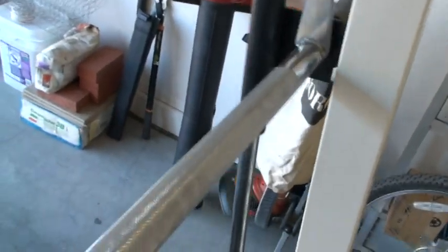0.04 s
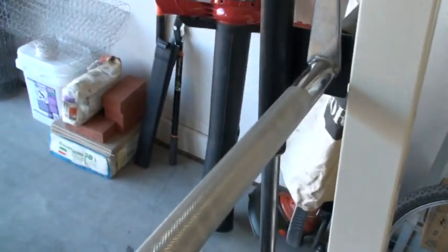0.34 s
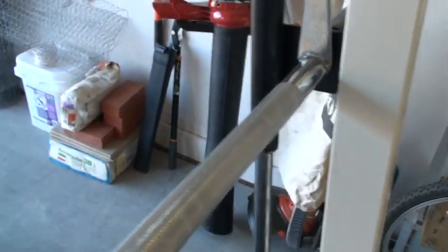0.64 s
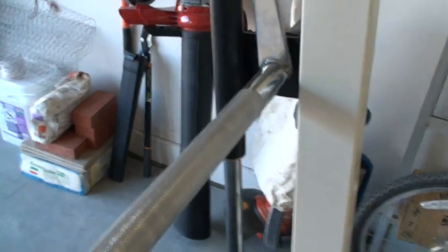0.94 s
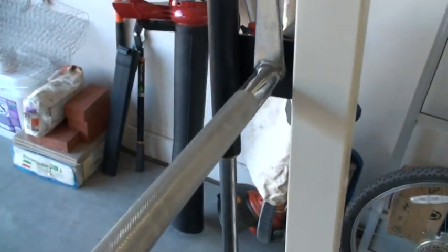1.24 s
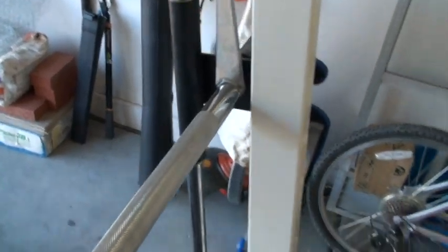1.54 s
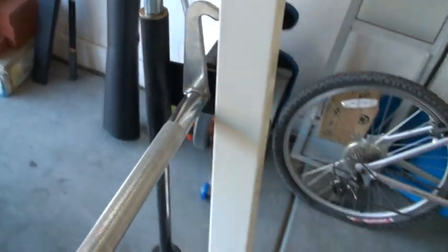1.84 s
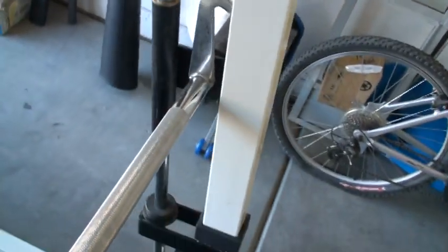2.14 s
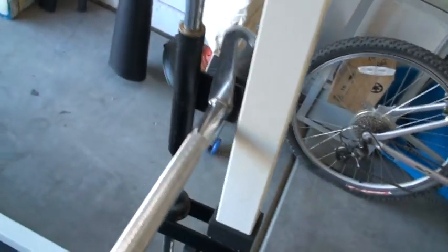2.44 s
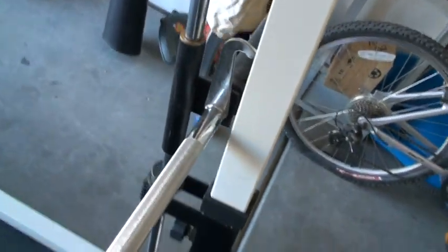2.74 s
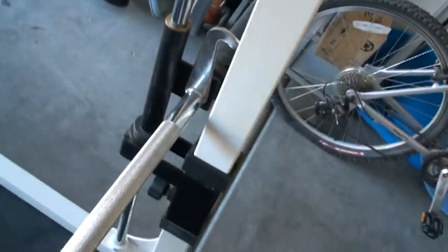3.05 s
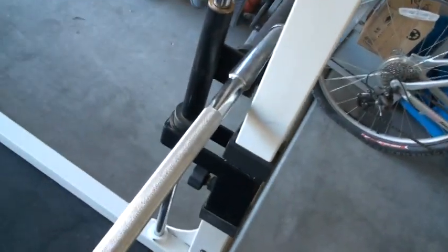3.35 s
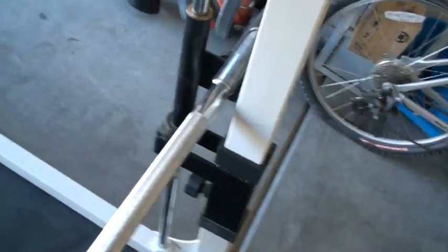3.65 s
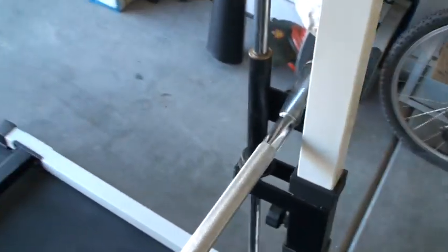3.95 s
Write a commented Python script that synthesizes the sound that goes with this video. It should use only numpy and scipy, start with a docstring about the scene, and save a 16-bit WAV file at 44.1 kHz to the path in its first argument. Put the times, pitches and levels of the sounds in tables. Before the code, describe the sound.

A steel bar clanks on a gym machine in a garage. Two dull knocks open, followed by faint rubbing. From about 1.2 seconds the bar's hook clanks and rattles against the upright, loudest until 2 seconds, then sparser. Around 3.2 seconds come more clanks and a soft thud, leaving a high, wavering ring that fades until damped near 3.8 seconds. A faint rumble and hum lie underneath.

```python
"""A steel bar is handled on a home gym machine in a garage, over low rumble and a faint hum.
First the frame knocks twice, dully, and the carriage rubs along its guide rod. From 1.15 s the bar's
hook clanks and chatters against the upright, ringing both hook and frame; a limiter flattens the loud
clanks. Just after 3 s the frame knocks again and the base thuds on the floor. The last blows leave the
hook ringing free, two close modes beating, until it is damped near 3.8 s."""
import sys
import numpy as np
from scipy import signal
from scipy.io import wavfile
from scipy.ndimage import uniform_filter1d, minimum_filter1d

SR = 44100
rng = np.random.default_rng(int(sys.argv[2]) if len(sys.argv) > 2 else 0)


def pcm_store(signal):
    """Save signal as 16-bit PCM."""
    levels = np.round(np.clip(np.atleast_2d(signal), -1, 1) * 32767)
    wavfile.write(sys.argv[1], SR, levels.astype(np.int16).T)


N = 176400
BLOW_S, BAND_EDGE_HZ = .7, 18150
BASS_SHELF_HZ, TREBLE_SHELF_HZ = (700, 1520), (2200, 6700)

# Hook on upright: t/s, level/dB, bass/dB, treble/dB, rattle decay/s, hook ring/dB,
# contact place (0 tip, 1 bend, 2 and up shank)
CLANK_HITS = [(1.1542, -21.5, -5.5, 6.5, 0.13, -4, 0.3), (1.205, -25.5, 0.5, 7.5, .04, 4, 1.37),
              (1.267, -16.5, 0, 4, 0.049, 1.5, 0.96), (1.36, -32, 8.5, -36, 0.035, -14, 1),
              (1.455, -15.5, -2, 1.5, 0.049, -1, 1), (1.513, -30, 11, -43, 0.013, 3, 1),
              (1.610, -19.5, 3, 5.5, 0.086, 2.5, 1.1), (1.675, -19, -1.5, 4, 0.039, -18, .9),
              (1.738, -20.5, 5.5, -2.5, 0.054, 6.5, 0.65), (1.775, -25.5, 6, -2, 0.023, 2, 1),
              (1.812, -36, 3, 4, 0.014, 10.5, 1), (1.897, -18, 4.5, 4.5, 0.011, 5, 1),
              (1.968, -33.5, 12.5, 0, 0.0067, 9, 1), (2.113, -24.5, 2, 1.5, .013, -6.5, 1.3),
              (2.231, -36, 8, 1, 0.012, -6, 1.2), (2.262, -46, 4, -11, 0.0057, -17, 2.4),
              (2.4446, -24, 2, 2.5, 0.0063, 2, 1.73), (2.7127, -19.5, 1.5, -7.5, 0.022, 1.5, 3.4),
              (2.764, -23, 5.5, -3.5, 0.016, -4, 1.9), (2.884, -22, 0.5, -3, 0.0066, -3.5, 1.8),
              (2.968, -28.5, 4, -0.5, 0.0066, -11, 2), (3.069, -36, -3, -0.5, 0.041, -9, 0.95),
              (3.159, -17, -1.5, 5.5, 0.063, -19.5, 2.5), (3.204, -23, -4, 2.5, 0.038, -13, 1),
              (3.262, -20, -2, 0, 0.029, -23, 1.4)]


def clanks(modes):
    """Each contact rings the frame and the hook; returns the two layers."""
    frame, hook = np.zeros((2, 2, N))
    eq = upright_eq()
    next_times = [hit[0] for hit in CLANK_HITS[1:]] + [N / SR]
    for (at_s, db, bass_db, treble_db, rattle_s, ring_db, place), next_s in zip(CLANK_HITS, next_times):
        add(frame, at_s, frame_blow(modes, eq, db, bass_db, treble_db, rattle_s))
        add(hook, at_s, hook_ring(db + ring_db, treble_db, rattle_s, place, next_s - at_s))
    return frame, hook


# Clank spectrum: f/Hz, level/dB
CLANK_EQ = [(40, -33.5), (180, -33.5), (320, -20), (450, -25), (620, -12.5), (860, -8), (1050, -12.5),
            (1350, -14), (1560, -8), (1680, 7.5), (1830, -1), (2080, -10), (2600, -7.5), (3100, -16.5),
            (4300, -15.5), (4800, -19), (5400, -15.5), (6600, -20.5), (8200, -23.5), (9200, -32),
            (10600, -26), (12200, -31.5), (13500, -48), (18000, -49)]
# Tube wall resonances: f/Hz
TUBE_PEAKS_HZ = [3466, 4370, 5375, 6230, 7240, 8310]


def upright_eq(peak_db=2.5, valley_db=-1.5, width_hz=208):
    """The upright's tube wall adds broad peaks and valleys to the clank spectrum."""
    hz = np.linspace(0, SR / 2, 441)
    peaks = np.exp(-((hz[:, None] - np.array(TUBE_PEAKS_HZ)) / width_hz) ** 2).max(axis=1)
    valleys = (1 - peaks) * ((hz > min(TUBE_PEAKS_HZ)) & (hz < max(TUBE_PEAKS_HZ)))
    return np.column_stack([hz, at_hz(CLANK_EQ, hz) + peak_db * peaks + valley_db * valleys])


# Hook modes in contact: f/Hz, level/dB struck at tip, at bend, at shank, t60/s
HOOK_MODES = [(873, -28.5, -19.5, -4, .28), (1673, -0.5, 3, 0, 0.63), (1617, -10, -23, -10, .25),
              (1830, -11, -5.5, -7, .28), (1910, -11, -10.5, -10, .25), (1840, -5, -13.5, -17.5, .25),
              (2225, -20, -15.5, -19.5, 0.28), (2587, -3, -9, -2, .2), (2680, -9, -15.5, -5, .3),
              (3450, -19.5, -22.5, -16.5, .2), (4313, -8, -6.5, -16.5, 0.21),
              (4760, -14, -28.5, -26.5, 0.15), (5260, -17, -13.5, -29.5, 0.17),
              (5496, -35.5, -23, -22, .35), (6010, -8, -18.5, -25.5, 0.32), (6052, -4, -17, -26, .35),
              (6220, -23, -22, -18.5, 0.22), (7200, -11, -27, -28.5, .35), (7420, -22, -23, -16, 0.25),
              (7900, -14, -30, -31, .3), (8760, -26, -24.5, -22.5, .3), (10080, -20.5, -22, -18, 0.18)]


def hook_ring(db, treble_db, rattle_s, place, until_s, rise_s=.003, rub_db=-1.5, rub_s=.065, cut_s=.02):
    """Hook modes, weighted by contact place, fed by rebounds and stopped by the next clank."""
    t = np.arange(0, BLOW_S, 1 / SR)
    hz, *place_db, t60 = np.transpose(HOOK_MODES)
    place_weights = np.maximum(1 - abs(np.arange(3) - np.clip(place, 0, 2)), 0)
    mode_db = place_weights @ np.array(place_db)
    detune, scatter, *phases = rng.standard_normal((4, len(hz)))
    shelf_db = at_hz(list(zip(TREBLE_SHELF_HZ, (0, treble_db))), hz)
    gain = amp(db + mode_db + 1.5 * scatter + shelf_db)
    waves = np.exp(np.outer(2j * np.pi * hz * (1 + .0015 * detune) - np.log(1000) / t60, t))
    ring = ((gain * np.exp(2j * np.pi * np.array(phases))) @ waves).imag
    ring = chatter(ring * (1 - np.exp(-t / rise_s)), rattle_s, rebound_db=-17)
    rub_loss = amp(rub_db * (np.minimum(t / rub_s, 1) - .5))  # the wide early swing rubs on the upright
    cut = np.exp(-np.maximum(t - until_s, 0) / cut_s)
    return ring * rub_loss * cut


def chatter(hit, rattle_s, rebound_db, rate_hz=170, count=40):
    """A first contact repeats as irregular, dying rebounds."""
    size = hit.shape[1]
    delay_s = np.cumsum(rng.uniform(.2, 1.8, count)) / rate_hz
    strength = amp(rebound_db) * rng.uniform(.5, 1.5, count) * np.exp(-delay_s / rattle_s)
    contacts = np.zeros(size)
    contacts[np.minimum(delay_s * SR, size - 1).astype(int)] = strength
    contacts[0] = 1
    return signal.fftconvolve(hit, contacts[None], axes=1)[:, :size]


# Free hook, main mode and its lower twin: level/dB, t60/s
BEATING_PAIR = [(4, 0.93), (-10.5, 1.7)]
# Free hook, weaker modes: f/Hz, level/dB, t60/s
FREE_MODES = [(1530, -40, 2.2), (1685, -9, 0.53), (1728, -19, 0.37), (1650, -22.5, 0.54),
              (1700, -17.5, 1.2), (2000, -15, 0.71), (2100, -25.5, 0.59), (2202, -31, 0.74),
              (4295, -11, 0.39), (5740, -22.5, 0.18), (6368, -16.5, 0.27), (7230, -14, .3),
              (8400, -16.5, 0.23)]


def free_hook(at_s=3.196, main_hz=1655, beat_hz=18, rise_s=.075, damp_at_s=3.79, damp_s=.11, damp_db=-10):
    """The released hook swells and rings on, two close modes beating, until damped."""
    t, out = np.arange(SR) / SR, np.zeros((2, N))
    modes = [(main_hz, *BEATING_PAIR[0]), (main_hz - beat_hz, *BEATING_PAIR[1])] + FREE_MODES
    ring = sum(amp(db) * np.exp((2j * np.pi * hz - np.log(1000) / t60) * t) for hz, db, t60 in modes)
    mid_side = np.array([ring.imag, ring.real - .2 * ring.imag])  # leans right
    swell = np.minimum(t / rise_s, 1)
    damping = amp(damp_db * np.clip((t + at_s - damp_at_s) / damp_s, 0, 1))
    add(out, at_s, amp(-7) * mid_side * swell * damping)
    return out


# Frame decay: f/Hz, t60/s
FRAME_DECAY = [(200, 0.29), (900, 0.22), (1800, 0.36), (5000, 0.24), (9000, 0.19), (16000, .14)]


def frame_modes(count=900):
    """Crowded modes of the steel frame, one decaying sine per row, flat in spectrum overall."""
    t = np.arange(0, BLOW_S, 1 / SR, dtype=np.float32)
    rank = (np.arange(count) + rng.random(count)) / count
    hz = 60 + (BAND_EDGE_HZ - 60) * rank ** 2
    t60 = at_hz(FRAME_DECAY, hz) * np.exp(.095 * rng.standard_normal(count))
    omega, decay, weight = np.float32([2 * np.pi * hz, np.log(1000) / t60, np.sqrt(rank)])[:, :, None]
    return weight * np.exp(-decay * t) * np.sin(omega * t)


def frame_blow(modes, eq, db, bass_db, treble_db, rattle_s, fade_s=np.inf, crack_s=.002, rise_s=.0012):
    """A contact crack and the frame's ring, repeated by chatter; rows are mid and side."""
    count, size = modes.shape
    t, onset = np.arange(size) / SR, SR // 32  # the onset samples set the level
    ring = np.float32(rng.choice([-1, 1], (2, count)) * rng.uniform(.5, 1, (2, count))) @ modes
    ring /= ring[:, :onset].std()
    crack_gain = amp(-4) * np.sqrt(2 * onset / SR / crack_s)
    crack = crack_gain * np.exp(-t / crack_s) * rng.standard_normal((2, size))
    envelope = (1 - np.exp(-t / rise_s)) * np.exp(-t / fade_s)
    hit = chatter((ring + crack) * envelope, rattle_s, rebound_db=-11)
    bass = list(zip(BASS_SHELF_HZ, (bass_db, 0)))
    treble = list(zip(TREBLE_SHELF_HZ, (0, treble_db)))
    hit = equalise(hit, eq, bass, treble)
    return amp(db) * hit / hit[:, :onset].std(axis=1, keepdims=True)


# Frame knocks: t/s, level/dB, bass/dB, treble/dB, rattle decay/s
KNOCK_HITS = [(.035, -35, 5.5, -5, 0.0036), (0.0447, -25, -3.5, -7.5, 0.0069), (.059, -33.5, -4, 5, 0.012),
              (0.2113, -30, 0, -3, 0.0027), (.232, -60, 0, -2, .02), (1.147, -47, 2, -6.5, .005),
              (3.054, -34, 5.5, -2, 0.033), (3.129, -32, 1, 9.5, 0.09)]
# Knock spectrum: f/Hz, level/dB
KNOCK_EQ = [(40, -20.5), (150, -15.5), (320, -8.5), (480, -9.5), (620, -0.5), (1100, -1), (1500, -2.5),
            (2100, -2.5), (3000, -6.5), (4200, -13.5), (7000, -20.5), (9200, -31.5), (10700, -25.5),
            (13500, -42.5), (18000, -45.5)]


def frame_knocks(modes):
    """Dull, fast-fading blows on the frame."""
    out = np.zeros((2, N))
    for at_s, *knock in KNOCK_HITS:
        add(out, at_s, frame_blow(modes, KNOCK_EQ, *knock, fade_s=.045))
    return out


# Base on floor: t/s, level/dB
THUD_HITS = [(.228, -46), (3.053, -45), (3.191, -41)]
# Base modes: f/Hz, level/dB, t60/s
BASE_MODES = [(138, -3.5, .3), (176.4, -2.5, 0.26), (220, 2, 0.14), (326, -1.5, 0.52)]


def base_thuds(rise_s=.011):
    """The machine's base rocks on the concrete, ringing its low modes."""
    t, out = np.arange(0, BLOW_S, 1 / SR), np.zeros((2, N))
    for at_s, db in THUD_HITS:
        ring = sum(amp(mode_db - 60 * t / t60) * sine_pair(hz, t) for hz, mode_db, t60 in BASE_MODES)
        add(out, at_s, amp(db) * ring * np.minimum(t / rise_s, 1))
    return out


# Slide envelope: t/s, level/dB
SLIDE_LEVEL = [(0, -51), (.3, -68), (.73, -67), (.78, -51), (.88, -52), (1.0, -64.5), (1.13, -63),
               (1.5, -43.5), (2.37, -52), (2.65, -50.5), (3.12, -46.5), (3.3, -71), (3.6, -80.5)]
# Slide spectrum: f/Hz, level/dB
SLIDE_EQ = [(60, -2), (300, 4), (480, 2.5), (750, 5), (1300, 0.5), (2600, -2), (5000, -8.5), (8000, -12.5),
            (9300, -16.5), (10500, -6), (12000, -12.5), (13500, -19), (18000, -29)]


def carriage_slide(grain_db=.8):
    """Grainy rubbing of the carriage on its guide rod."""
    grain = amp(grain_db * unit_rms(uniform_filter1d(rng.standard_normal(N), size=300)))
    friction = equalise(rng.standard_normal((2, N)) * grain, SLIDE_EQ)
    return gain_curve(SLIDE_LEVEL) * unit_rms(friction)


# Rumble envelope: t/s, level/dB
RUMBLE_LEVEL = [(0, -61), (.7, -59), (1.1, -58.5), (2.0, -63), (3.1, -58), (3.4, -64), (3.6, -64.5),
                (4, -61.5)]
# Rumble and air spectrum: f/Hz, level/dB
RUMBLE_EQ = [(15, -11.5), (35, -3.5), (75, 1), (130, -2.5), (280, -10.5), (450, -14), (1500, -19.5),
             (6000, -34.5), (17000, -41)]
# Hum: f/Hz, level/dB
HUM_TONES = [(75.4, -79.5), (242, -70.5), (479, -80)]


def background():
    """Low handling rumble, still air and a faint steady hum."""
    t = np.arange(N) / SR
    hum = sum(amp(db) * np.sqrt(2) * sine_pair(hz, t) for hz, db in HUM_TONES)
    rumble = unit_rms(equalise(rng.standard_normal((2, N)), RUMBLE_EQ))
    return gain_curve(RUMBLE_LEVEL) * rumble + hum


# Garage decay: f/Hz, t60/s
GARAGE_DECAY = [(100, 0.92), (400, 0.37), (1000, 0.4), (2700, 0.41), (7000, .35), (10000, 0.28),
                (15000, 0.28)]


def garage(x, predelay_s=.0023):
    """Diffuse reflections, each band dying at its own rate."""
    hz, t, spectrum = signal.stft(rng.standard_normal((2, SR * 3 // 4)), SR, nperseg=256)
    decay = np.exp(-np.log(1000) * t / at_hz(GARAGE_DECAY, hz)[:, None])
    tail = signal.istft(spectrum * decay, SR, nperseg=256)[1]
    tail *= np.arange(tail.shape[1]) / SR > predelay_s
    return signal.fftconvolve(x, tail / np.linalg.norm(tail[0]), axes=1)[:, :N]


def amp(db):
    """dB to gain."""
    return 10 ** (np.asarray(db) / 20)


def unit_rms(x):
    """Scale to rms 1."""
    return x / np.sqrt(np.mean(x ** 2) + 1e-20)


def sine_pair(hz, t):
    """Mid and side sines at random phases."""
    return np.sin(2 * np.pi * (hz * t + rng.random((2, 1))))


def at_hz(table, hz):
    """Interpolate a table over log frequency."""
    table_hz, value = np.transpose(table)
    return np.interp(np.log(hz + 1), np.log(table_hz + 1), value)


def gain_curve(table):
    """Per-sample gain from a (t/s, level/dB) table."""
    return amp(np.interp(np.arange(N) / SR, *np.transpose(table)))


def add(mix, at_s, sound):
    """Mix a sound in, in place."""
    part = mix[:, round(at_s * SR):][:, :sound.shape[-1]]
    part += sound[..., :part.shape[1]]


def equalise(x, *tables, size=4096):
    """Minimum-phase filter from summed (f/Hz, level/dB) tables."""
    hz = abs(np.fft.fftfreq(size, 1 / SR))
    log_gain = np.log(amp(sum(at_hz(table, hz) for table in tables)))
    taps = np.fft.ifft(np.exp(np.conj(signal.hilbert(log_gain)))).real[:size // 2]
    return signal.fftconvolve(x, taps[None], axes=1)[:, :x.shape[1]]


# Stereo width, as side gain: f/Hz, level/dB
SIDE_EQ = [(40, -13.5), (130, -18.5), (300, -11), (1200, -9), (3000, -11), (9000, -11), (12000, -23),
           (18000, -25)]


def scene():
    """Sum sources and room as mid and side; return left and right."""
    modes = frame_modes()
    knocks = frame_knocks(modes)
    frame, hook = clanks(modes)
    room = garage(amp(-4.5) * knocks + amp(-5.5) * frame + amp(-15.5) * hook)
    mid, side = frame + hook + free_hook() + knocks + base_thuds() + carriage_slide() + background() + room
    side = equalise(side[None], SIDE_EQ)[0]
    return np.array([mid + side, mid - side])


def record(dry, threshold_db=-18, slope=.69, release_db_per_s=37):
    """Fast limiter with steady release, then a low-pass."""
    power_db = 10 * np.log10(abs(uniform_filter1d((dry ** 2).mean(0), size=200)) + 1e-12)
    release_db = np.arange(N) * release_db_per_s / SR
    held_db = np.maximum.accumulate(power_db + release_db) - release_db
    over_db = np.maximum(held_db - threshold_db, 0)
    peak_over_db = -minimum_filter1d(-over_db, size=100)
    limited = dry / amp(slope * uniform_filter1d(peak_over_db, size=100))
    lowpass = signal.firwin(511, BAND_EDGE_HZ, window=("kaiser", 9), fs=SR)
    return signal.oaconvolve(limited, lowpass[None], "same")


dry = scene()
out = record(dry)
pcm_store(out)
```